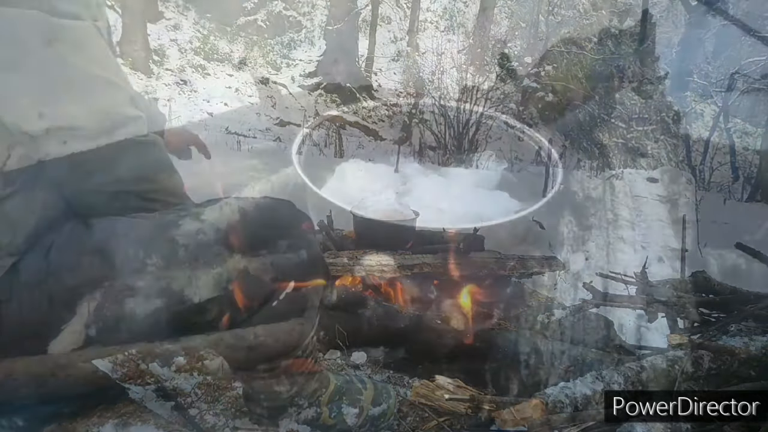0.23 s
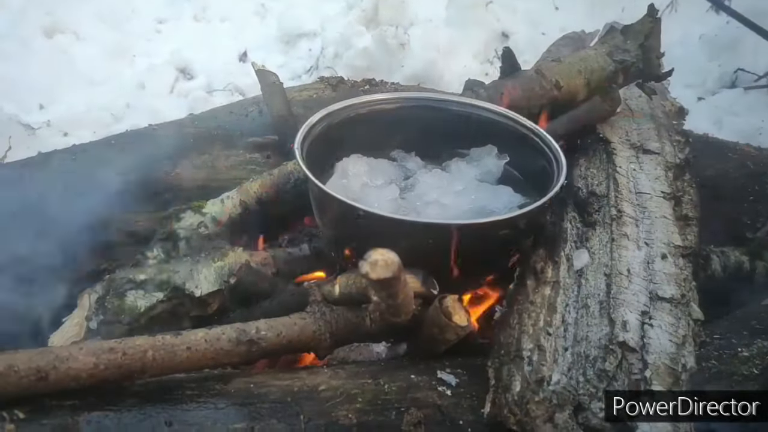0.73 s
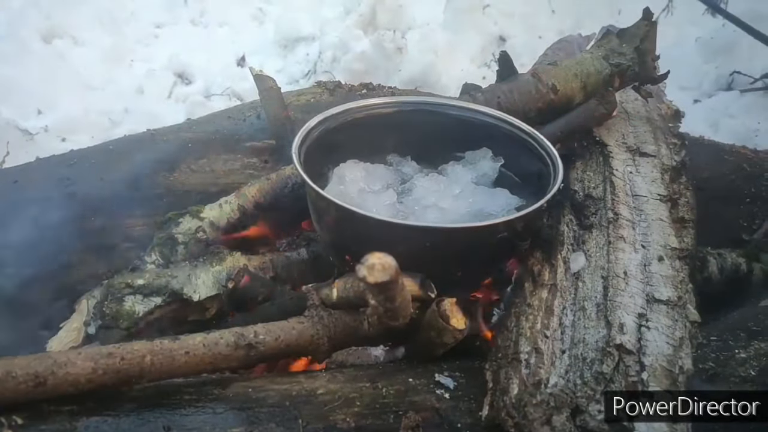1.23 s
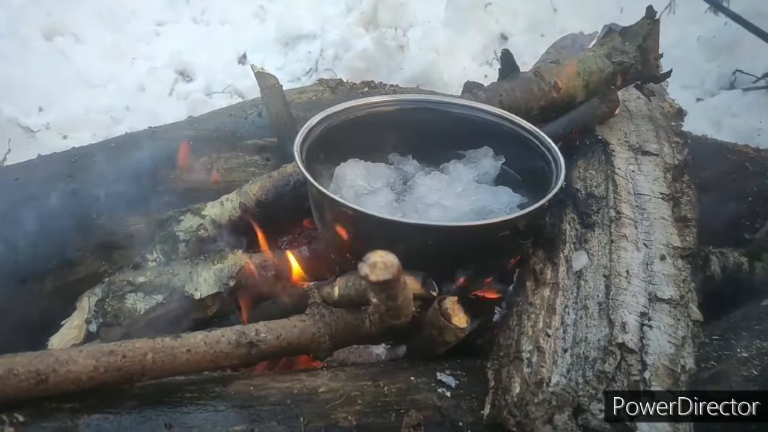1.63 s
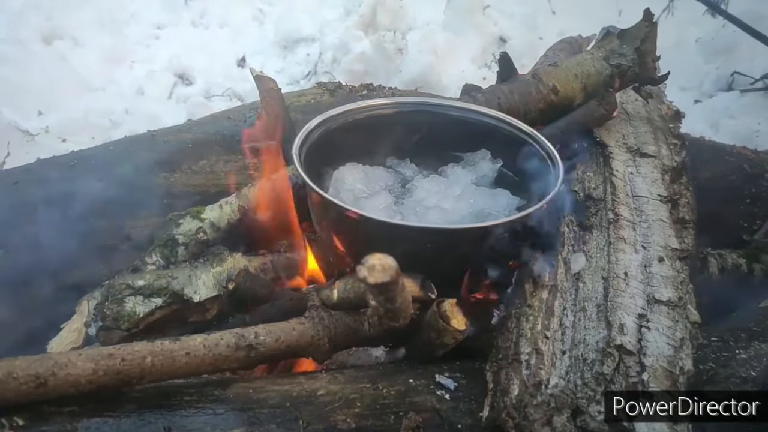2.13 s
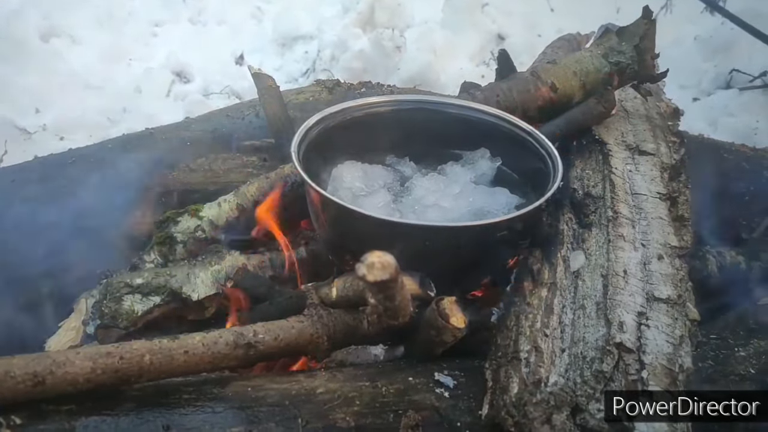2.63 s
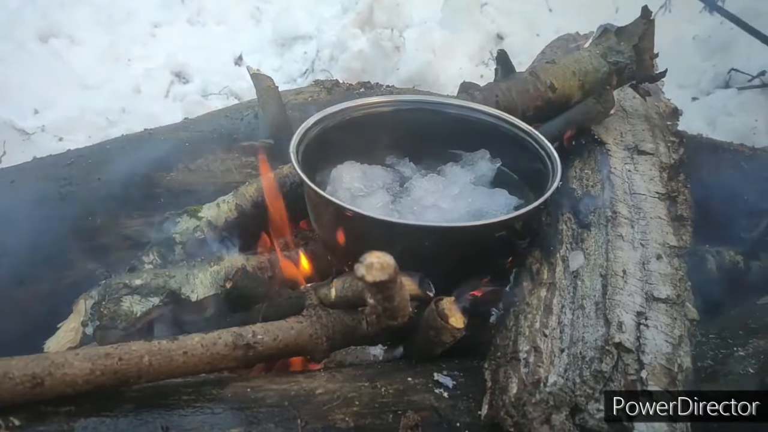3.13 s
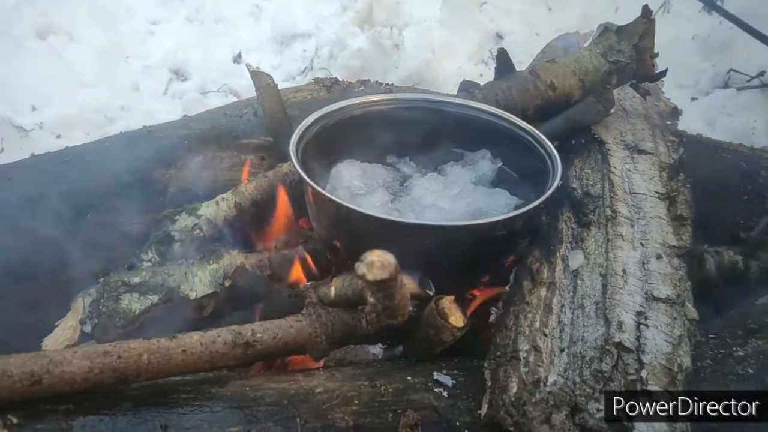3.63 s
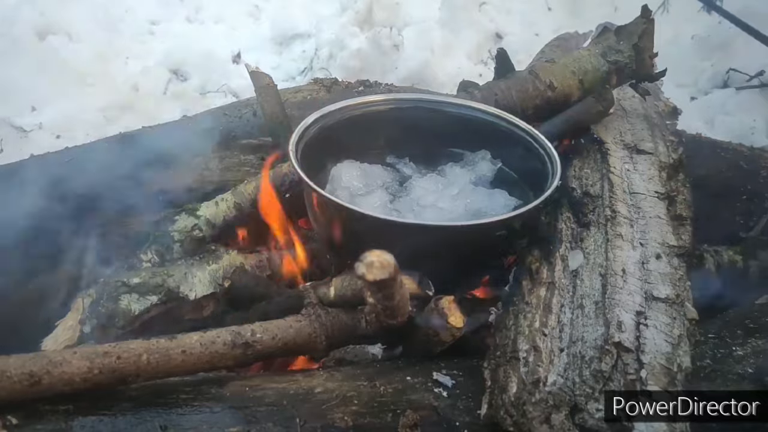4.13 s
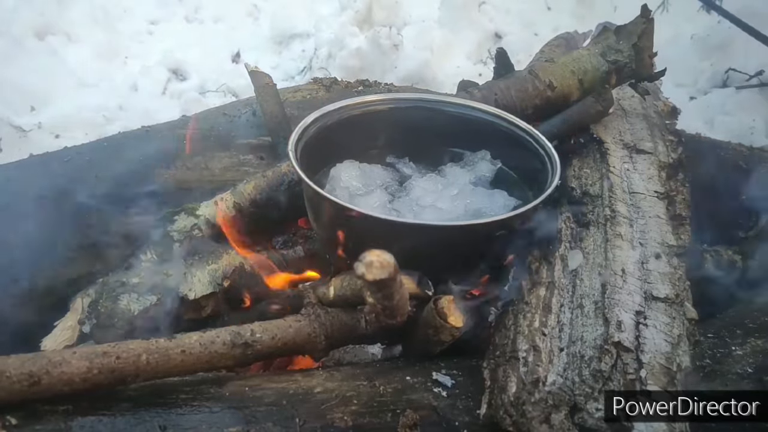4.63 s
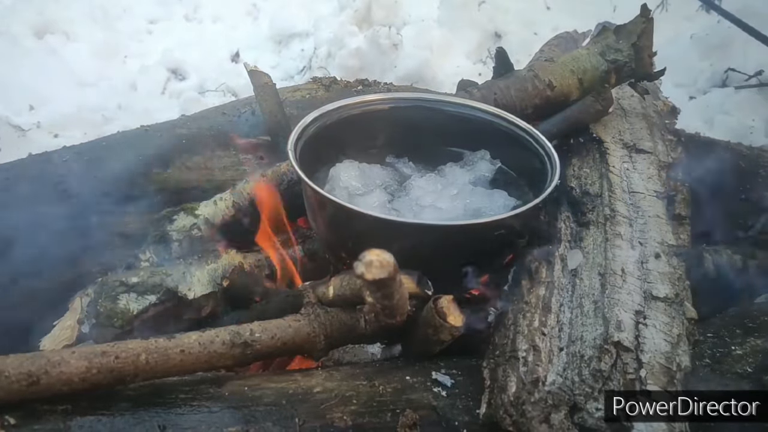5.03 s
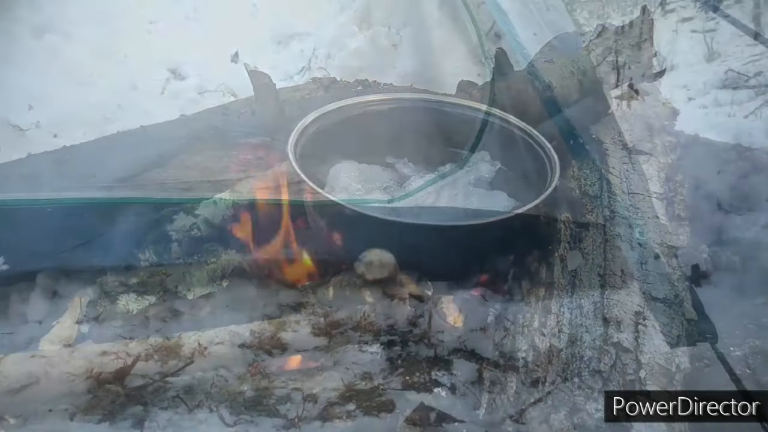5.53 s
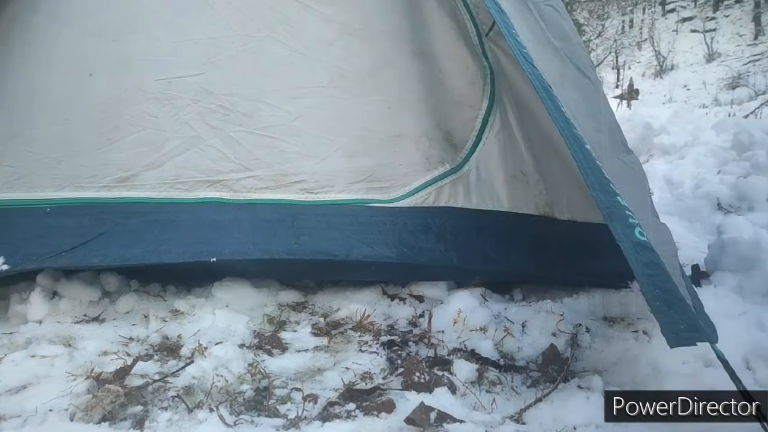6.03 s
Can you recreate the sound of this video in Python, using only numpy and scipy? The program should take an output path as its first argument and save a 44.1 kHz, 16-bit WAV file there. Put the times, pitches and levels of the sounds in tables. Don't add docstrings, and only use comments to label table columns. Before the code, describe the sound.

A wet-wood campfire hisses steam, crackles and pops close by in buffeting wind, after a faint distant opening and silent gap, ending with rustling tent cloth.

```python
import sys
import numpy as np
from scipy import signal
from scipy.fft import rfft, irfft, next_fast_len
from scipy.io import wavfile
from scipy.ndimage import uniform_filter1d

SR = 44100
rng = np.random.default_rng(int(sys.argv[2]) if len(sys.argv) > 2 else 0)


def unload_wav(signal):
    wavfile.write(
        sys.argv[1],
        SR,
        np.round(np.clip(np.atleast_2d(signal).T, -1, 1) * 32767).astype(np.int16),
    )


def to_linear_factor(level_db):
    exponent = np.asarray(level_db, float) / 20
    return 10 ** exponent


N = 276639

# (time [s], level [dB], left minus right [dB])
SAP_STEAM = [(.7, -38, -1.5), (1.0, -35, 0), (1.21, -37, -2), (1.37, -37.5, 0), (1.55, -35.5, 0),
             (2.06, -38, 0), (2.15, -35.5, -1), (2.5, -37.5, -2), (2.68, -35.5, -1), (2.88, -37, 3.5),
             (3.1, -35.5, -3), (3.68, -34.5, -1.5), (4.0, -36.5, -3.5), (4.68, -37, -1), (4.88, -39, -4),
             (4.97, -37.5, 0.5), (5.5, -34.5, 1.5), (5.72, -35.5, 0.5)]
# (frequency [Hz], density [dB per Hz])
STEAM_SPECTRUM = [(700, -18), (1100, -14.5), (1600, -15), (2200, -8.5), (2900, -11.5), (3300, -6),
                  (3650, -10.5), (4450, -2), (5200, -7.5), (5700, -11.5), (6100, -8.5), (7100, -4),
                  (7900, -8.5), (8800, -4), (10000, 0.5), (11500, -5.5), (13500, -8), (15500, -8.5)]
# (frequency [Hz], left minus right [dB])
STEAM_BALANCE = [(1000, 3), (5000, 1), (7000, -0.5), (10000, -6), (12000, -1), (15000, -4.5)]
# (frequency [Hz], share [0-1])
STEAM_COHERENCE = [(1000, 0.35), (2000, 0.34), (3200, 0.29), (4500, 0.47), (5800, 0.44), (7200, 0.19),
                   (8900, 0.91), (11500, 0.57), (15000, 0.27)]
LOG_DELAYS_MS = [0.161, 0.14]
# (time [s], share [0-1])
OUTER_LOG_SHARE = [(.7, 0.4), (1.2, 0.47), (1.8, .6), (2.3, 0.32), (2.9, 0.76), (3.3, 0.47), (3.9, 0.63),
                   (4.4, 0.3), (4.85, 0.66), (5.1, 0.7), (5.35, 0.74), (5.72, 0.7)]


def steam():
    level_db, pan_db = in_time(SAP_STEAM)
    logs = []
    for delay_ms in LOG_DELAYS_MS:
        jet = rms_one(0.46 * rng.standard_normal(N) + 0.41 * grains(3000, 3.7))
        logs.append(two_ports(jet, delay_ms / 1000, STEAM_COHERENCE))
    outer, inner = logs
    share = np.clip(in_time(OUTER_LOG_SHARE)[0], 0, 1)
    source = np.sqrt(share) * outer + np.sqrt(1 - share) * inner
    together = drift(5.0, spread_db=1.08)
    out = 0
    edges = np.geomspace(500, 17000, num=25)
    for low, high in zip(edges, edges[1:]):
        band = signal.sosfilt(signal.butter(3, [low, high], "band", fs=SR, output="sos"), source)
        wander = drift(9.5, spread_db=0.83)
        centre = (band[0] + band[1]) * wander
        apart = (band[0] - band[1]) / wander
        sputter = together * np.array([drift(16.0, spread_db=1.3), drift(15.5, spread_db=1.46)])
        out = out + np.array([centre + apart, centre - apart]) * sputter
    return to_linear_factor(level_db + 2.5) * sides(pan_db) * colour(out, STEAM_SPECTRUM, STEAM_BALANCE)


# (time [s], peak [dB], left minus right [dB], pitch [Hz], 60 dB decay [ms])
CRACKLE_EVENTS = [(.006, -35.5, 6, 8040, 11), (.086, -36.5, 1, 12000, 4.4), (0.13, -33.5, 17, 8500, 12),
                  (.372, -34, 15.5, 9020, 7.4), (.4092, -26.5, 7, 10500, 6.4), (.4115, -37, 3, 9000, 20),
                  (.864, -23, -7, 11500, 10), (1.354, -21, 5, 4500, 6), (1.356, -21, 5, 9000, 8),
                  (1.3657, -15.5, 10, 5000, 13), (2.16, -20, -4, 5000, 11), (3.5135, -13.5, 9, 8500, 5.4),
                  (3.5148, -30, 5, 7000, 10), (3.8748, -25, 1, 10000, 12), (3.8837, -27.5, 9, 5030, 5),
                  (3.8838, -16, 0.5, 13500, 5), (3.8887, -21, 1, 10000, 14), (4.626, -25, 0, 9300, 10),
                  (5.618, -25, 15, 2500, 56), (5.829, -20.5, -4, 9900, 13), (5.953, -26, -2, 12100, 5.7),
                  (6.14, -24.5, -3, 2500, 5.2), (6.198, -47, -15, 3000, 5.1)]


def crackles():
    length, width = 4000, 1.3
    out = np.zeros((2, N + length))
    bursts = rng.standard_normal((len(CRACKLE_EVENTS), 2, length))
    for (s, peak_db, pan_db, hz, decay_ms), burst in zip(CRACKLE_EVENTS, bursts):
        edges = np.clip([hz * (1 - width / 2), hz * (1 + width / 2)], 300, 0.45 * SR)
        decay = to_linear_factor(-60 * np.arange(length) / SR / (decay_ms / 1000))
        burst = (burst[0] + 0.43 * burst) * decay
        burst = signal.lfilter(*signal.butter(1, edges, "band", fs=SR), burst)
        i = round(s * SR)
        out[:, i:i + length] += to_linear_factor(peak_db) * sides(pan_db)[:, None] * burst / np.abs(burst).max()
    return out[:, :N]


# (time [s], peak [dB], left minus right
# [dB], pitch [Hz])
POP_EVENTS = [(1.312, -26, 0, 406), (1.357, -23.5, 0, 460), (1.509, -24, 6, 500), (1.571, -25, 4, 730),
              (1.624, -28, -1, 417), (1.715, -29, 1, 710), (1.75, -24, 0, 467), (2.456, -22, 5, 490),
              (3.71, -17.5, 1.5, 487), (4.088, -27, 1, 395), (4.575, -21.5, 3, 416), (4.86, -36, -2, 418),
              (5.46, -21.5, 5, 577), (5.668, -24, 4, 440), (5.779, -17.5, -4, 550), (5.828, -15.5, -3, 388),
              (5.797, -22, 0, 450), (5.862, -33, 0, 450), (5.92, -23, -4, 486), (6.066, -22.5, 0, 1130),
              (6.122, -33, 0, 750), (6.145, -24, 0, 780)]


def pops():
    t = np.arange(4000) / SR
    out = np.zeros((2, N + len(t)))
    for s, peak_db, pan_db, hz in POP_EVENTS:
        t60 = 7.3 / hz
        ring = np.sin(2 * np.pi * hz * t) * to_linear_factor(-60 * t / t60)
        click = np.sin(2 * np.pi * 0.77 * hz * t) * to_linear_factor(-300 * t / t60)
        i = round(s * SR)
        out[:, i:i + len(t)] += to_linear_factor(peak_db) * sides(pan_db)[:, None] * (0.22 * ring + 1.12 * click)
    return out[:, :N]


# (time [s], level [dB])
FLARE_EVENTS = [(.87, -46.5), (.99, -46), (1.52, -44), (1.7, -46.5), (2.13, -51), (2.208, -44.5),
                (2.49, -64), (2.58, -47.5), (2.79, -45), (3.08, -42.5), (3.208, -45), (3.42, -50),
                (3.918, -49), (4.08, -59), (4.64, -47), (5.43, -52.5), (5.56, -45)]


def flame_level():
    rest_db, flicker_db, flicker_per_s, flare_half_s = -48.5, 0, 11, 0.042
    power = to_linear_factor(2 * (rest_db + flicker_db * drift(flicker_per_s)))
    flares = sum(to_linear_factor(2 * db) * swell(s, flare_half_s) for s, db in FLARE_EVENTS)
    return 10 * np.log10(power + flares)


# (frequency [Hz], density [dB per Hz])
FLAME_SPECTRUM = [(50, 4), (100, 4), (200, -3), (300, -13), (450, -10), (600, -19.5), (900, -26.5),
                  (1600, -27)]


def flames():
    lumps = to_linear_factor(3.27 * drift(38.6))
    roar = lumps * two_ports(rng.standard_normal(N), 0, alike=0.95)
    return to_linear_factor(flame_level() + 8.0) * colour(roar, FLAME_SPECTRUM)


# (time [s], level [dB])
DRIP_LEVEL = [
    (.7, -51.5),
    (4.85, -65),
    (5.0, -46.5),
    (5.2, -43),
    (5.4, -45.5),
    (5.49, -36),
    (5.56, -44),
    (5.63, -39.5),
    (5.72, -62),
]
# (frequency [Hz], density [dB per Hz])
SIZZLE_SPECTRUM = [(400, -29), (700, 18.5), (1000, 5.5), (1500, 10.5), (2400, 10), (3700, 13.5), (5500, 6),
                   (8500, 8.5), (14000, 3.5)]


def sizzle():
    bubbles = 1.5 * rng.standard_normal(N) + 0.22 * grains(1400, 5.1)
    fizz = two_ports(bubbles, left_lag_s=-13 / SR, alike=0.59)
    return to_linear_factor(in_time(DRIP_LEVEL)[0]) * sides(0.6)[:, None] * colour(fizz, SIZZLE_SPECTRUM)


# (time [s], level [dB])
HAND_FORCE = [(5.75, -45), (5.764, -46), (5.772, -27), (5.802, -31), (5.813, -30.5), (5.829, -27),
              (5.845, -30.5), (5.868, -23.5), (5.877, -29), (5.888, -57), (5.94, -74)]
# (frequency [Hz], density [dB per Hz])
CLOTH_SPECTRUM = [(200, -0.5), (400, -23.5), (800, -14.5), (1400, -28), (2500, -21), (4500, -23),
                  (6200, -25.5), (9500, -21), (12500, -25.5), (15500, -29)]


def tent_cloth():
    stroke_db, = in_time(HAND_FORCE)
    rub = (0.5 * rng.standard_normal(N) + 0.5 * grains(1200, 2.7)) * to_linear_factor(2.6 * drift(90))
    # (frequency [Hz], share [0-1])
    lean = [(300, 1.0), (1200, -6.0), (2400, 9), (4000, -16), (8000, -3), (12000, -30.0)]
    alike = [(1500, 0.9), (4000, 0.61), (7000, 0.5)]
    cloth = two_ports(rms_one(rub), left_lag_s=16 / SR, alike=alike)
    return to_linear_factor(stroke_db) * colour(cloth, CLOTH_SPECTRUM, lean)


# (time of the height [s], level [dB], left minus right [dB], half length [s])
GUST_EVENTS = [(0.084, -35, -6, 0.071), (0.212, -36, 1, 0.16), (0.336, -34.5, -20, 0.096),
               (0.726, -33.5, 7, 0.036), (0.874, -18, -24, 0.037), (1.012, -24, -28, 0.039),
               (1.136, -31, -11, 0.046), (1.384, -30, -24, 0.043), (1.587, -28.5, 2, 0.085),
               (1.762, -32.5, -4, 0.12), (2.034, -28.5, 1, 0.026), (2.278, -30.5, -10, 0.037),
               (2.5, -33.5, -25, 0.065), (2.696, -33, -9, 0.033), (3.023, -28.5, 4, 0.015),
               (3.1, -27, -30, 0.018), (3.448, -30, -34, 0.051), (3.545, -29.5, -15, 0.033),
               (3.746, -29, -25, 0.049), (3.942, -38, -1, 0.21), (4.096, -39, -22, .05),
               (4.213, -38, 5, 0.045), (4.43, -34, -6, 0.057), (4.736, -37, -18, 0.077),
               (5.436, -34, 0, 0.017), (5.562, -31.5, 5, 0.0085), (5.816, -25.5, 4, 0.05),
               (5.92, -32.5, 18, 0.25), (6.116, -36, 4, 0.14), (6.257, -29.5, 17, 0.038)]


def gusts():
    power = np.full((2, N), to_linear_factor(2 * -42))
    for s, level_db, pan_db, half_s in GUST_EVENTS:
        power += (to_linear_factor(level_db) * sides(pan_db)[:, None]) ** 2 * swell(s, half_s)
    return np.sqrt(power)


# (frequency [Hz], density [dB per Hz])
EDDY_SPECTRUM = [(14, 3.5), (28, 3), (45, -2.5), (65, -8), (95, -15.5), (140, -19.5), (250, -34.5),
                 (500, -55)]
# (frequency [Hz], density [dB per Hz])
EDGE_SPECTRUM = [(40, -25), (90, 19), (140, -16.5), (220, -12), (350, -27), (600, -17.5), (1200, -78)]
# (time [s], peak [dB], left minus right [dB], width [ms])
BUFFET_EVENTS = [
    (0.346, -18, -25, 2.1),
    (0.8756, -9, -39, 1.47),
    (0.915, -18.5, -31, 1.13),
    (0.998, -11.5, -34, 1.17),
    (1.008, -9, -33, 2.1),
    (6.04, -24, 20, 26),
    (6.088, -16.5, 29, 3.3),
    (6.135, -16, 22, 6.8),
    (6.255, -15.5, 29, 13.5),
]


def wind():
    strength = to_linear_factor(2.5) * gusts()
    eddies = colour(two_ports(rng.standard_normal(N), 0, alike=0.44), EDDY_SPECTRUM)
    eddies = eddies / np.sqrt(uniform_filter1d(eddies ** 2, size=4000) + 0.036)
    eddies = eddies * np.array([drift(9.5, spread_db=2.5), drift(8.1, spread_db=2.0)])
    lumps = to_linear_factor(3.0 * np.array([drift(22.0), drift(24)]))
    edge = colour(rng.standard_normal((2, N)) * lumps, EDGE_SPECTRUM)
    t = np.arange(N) / SR
    shelter_db = np.where(t > TAKES_S[2][0], -14.0, 0)
    edge_gain = to_linear_factor(shelter_db - 23.5) * (strength / to_linear_factor(-41.0)) ** 0.26
    out = strength * (eddies + edge * edge_gain)
    for s, peak_db, pan_db, width_ms in BUFFET_EVENTS:
        near = slice(round((s - 0.12) * SR), round((s + 0.12) * SR))
        u = (t[near] - s) / (width_ms / 1000)
        push = np.exp(-u ** 2) - 0.34 * np.exp(-(u / 4) ** 2)
        out[:, near] += to_linear_factor(peak_db) * sides(pan_db)[:, None] * push
    return out


def still_air(spectrum, left_lag_s, alike):
    return to_linear_factor(1.23 * drift(6.3)) * colour(two_ports(rng.standard_normal(N), left_lag_s, alike), spectrum)


# (frequency [Hz], density [dB per Hz])
CAMP_SPECTRUM = [(350, 2.5), (500, -7), (780, 0.5), (1200, -6), (1650, -7), (2000, -4), (2500, -5),
                 (4500, -3), (6400, -6), (10500, -2.5), (14000, -6), (15500, -10.5)]
# (time [s], level [dB])
CAMP_AIR_LEVEL = [
    (5.72, -51),
    (5.76, -38.5),
    (5.9, -37),
    (6.0, -38.5),
    (6.27, -41.5),
]
# (frequency [Hz], share [0-1])
CAMP_COHERENCE = [(400, 0.83), (1000, 0.63), (1600, 0.62), (2300, 0.38), (4000, 0.13), (9000, 0.19)]


def camp_air():
    hiss = still_air(CAMP_SPECTRUM, left_lag_s=0.000302, alike=CAMP_COHERENCE)
    return to_linear_factor(in_time(CAMP_AIR_LEVEL)[0]) * hiss


# (frequency [Hz], density [dB per Hz])
WOOD_SPECTRUM = [(300, -2), (600, -8), (1200, -10), (2000, -12), (3000, -14), (4500, -16), (7000, -20),
                 (10000, -19.5), (13000, -21.5), (15500, -23)]


def wood_air():
    return to_linear_factor(-51) * still_air(WOOD_SPECTRUM, left_lag_s=-15 / SR, alike=0.31)


def rms_one(x):
    return x / np.sqrt(np.mean(x ** 2) + 1e-20)


def in_time(rows):
    s, *columns = np.transpose(rows)
    return [np.interp(np.arange(N) / SR, s, c) for c in columns]


def at_hz(points, hz):
    table_hz, values = np.array(points)[:, 0], np.array(points)[:, 1]
    return np.interp(np.log(hz), np.log(table_hz), values)


def sides(pan_db):
    ratio = to_linear_factor(np.asarray(pan_db))
    return np.sqrt(2 / (1 + ratio ** 2)) * np.array([ratio, np.ones_like(ratio)])


def swell(s, half_s):
    return np.exp(-((np.arange(N) / SR - s) / half_s) ** 2)


def drift(rate, spread_db=None):
    r = np.exp(-80 * np.pi * rate / SR)
    slow = signal.lfilter([1], [1, -2 * r, r * r], rng.standard_normal(N // 40 + 2002))[2000:]
    slow = rms_one(slow - slow.mean())
    values = slow if spread_db is None else to_linear_factor(spread_db * slow)
    return np.interp(np.arange(N) / 40, np.arange(len(slow)), values)


def colour(x, spectrum, lean=((20, 0), (20000, 0))):
    size = next_fast_len(N)
    hz = np.arange(size // 2 + 1) * SR / size + 1e-3
    bass_fall = np.minimum(hz / spectrum[0][0], 1) ** 2
    gain = to_linear_factor(at_hz(spectrum, hz)) * bass_fall * sides(at_hz(lean, hz))
    return rms_one(irfft(rfft(x, size) * gain, size)[:, :N])


def two_ports(direct, left_lag_s, alike):
    size = next_fast_len(N)
    hz = np.arange(size // 2 + 1) * SR / size + 1e-3
    alike = np.clip(at_hz(alike, hz) if np.ndim(alike) else alike, 0, 1)
    lagged = rfft(direct, size) * np.exp(-2j * np.pi * hz * np.array([[left_lag_s], [0]]))
    scattered = rfft(rng.standard_normal((2, N)), size)
    return irfft(np.sqrt(alike) * lagged + np.sqrt(1 - alike) * scattered, size)[:, :N]


def grains(per_s, spread_db):
    sizes = to_linear_factor(spread_db * np.minimum(rng.exponential(1, N), 5)) * rng.choice([-1, 1], N)
    return rms_one(sizes * (rng.random(N) < per_s / SR))


# (start [s], end [s])
TAKES_S = [
    (0.0, .472),
    (.7015, 5.723),
    (5.723, 6.28),
]


def scene():
    t = np.arange(N) / SR
    far, close, tent = [(t >= start) & (t < end) for start, end in TAKES_S]
    fire = steam() + flames() + sizzle()
    camp = camp_air() + tent_cloth()
    everywhere = wind() + crackles() + pops()
    return far * wood_air() + close * fire + tent * camp + (far | close | tent) * everywhere


def top_cut(x):
    return signal.sosfilt(signal.butter(12, 15650, fs=SR, output="sos"), x)


def record(dry):
    low_pass = signal.cheby2(12, 60, 16100, fs=SR, output="sos")
    mix = signal.sosfilt(low_pass, dry)
    return top_cut(mix)


dry = scene()
out = record(dry)
unload_wav(out)
```